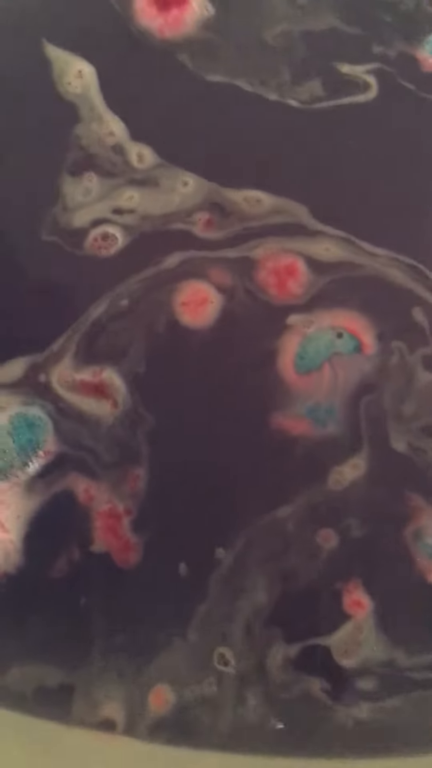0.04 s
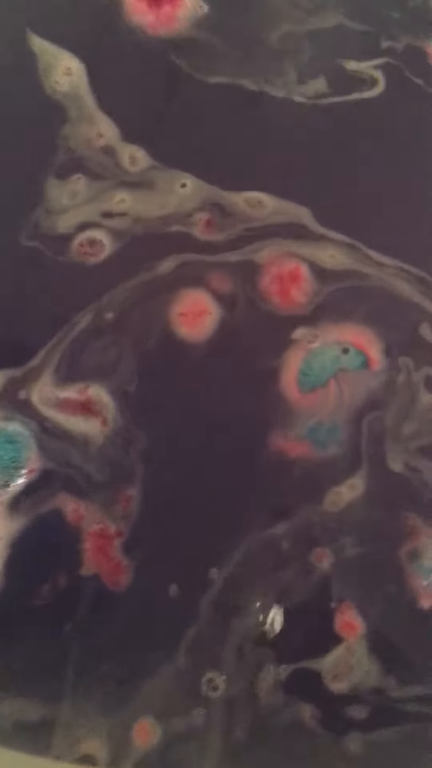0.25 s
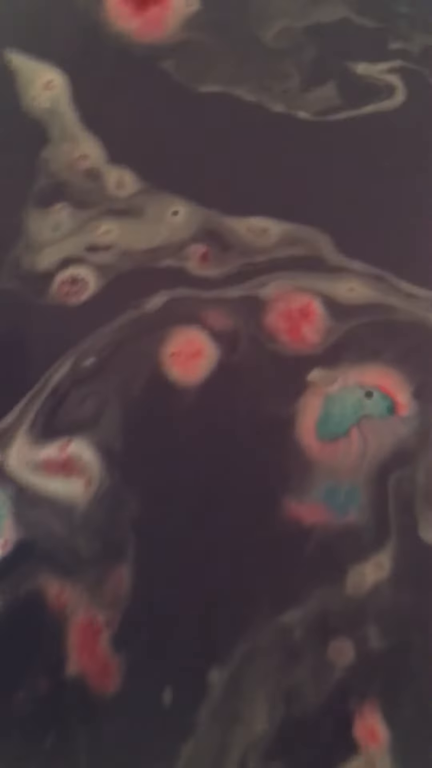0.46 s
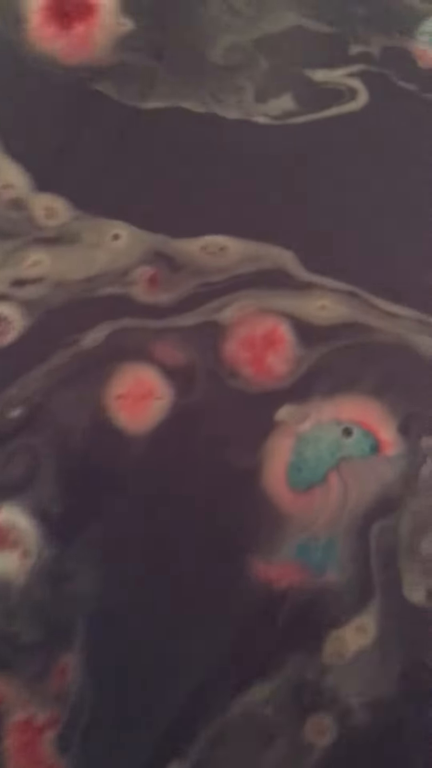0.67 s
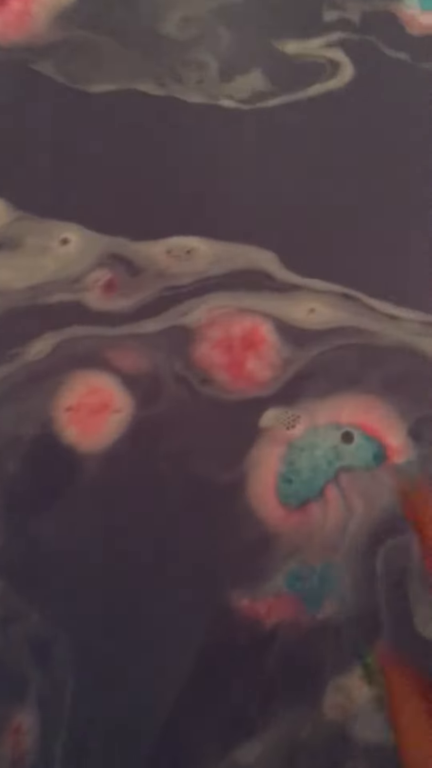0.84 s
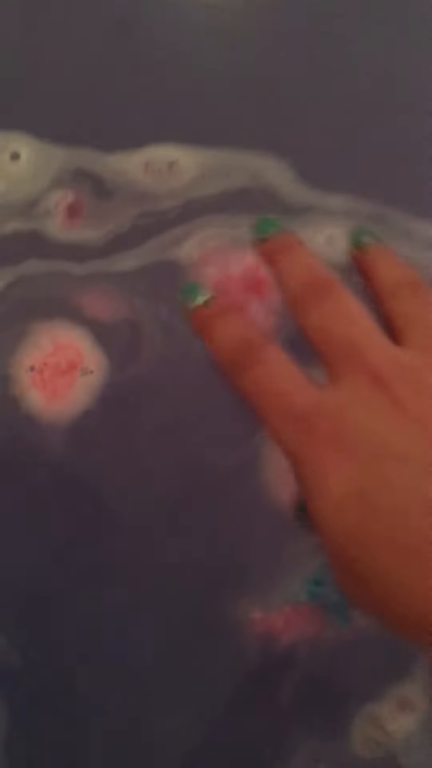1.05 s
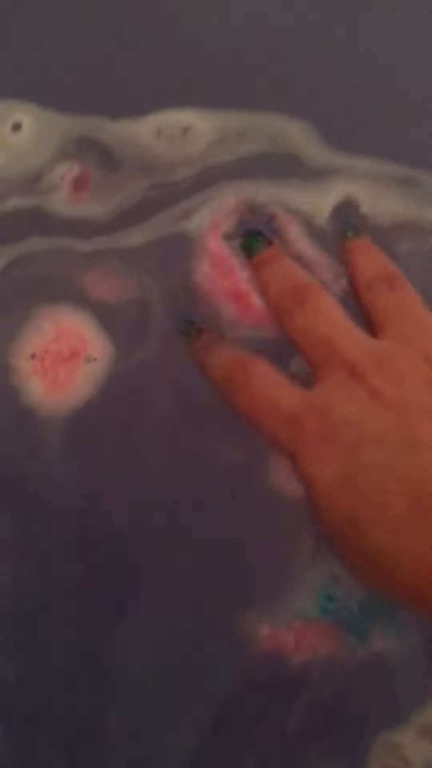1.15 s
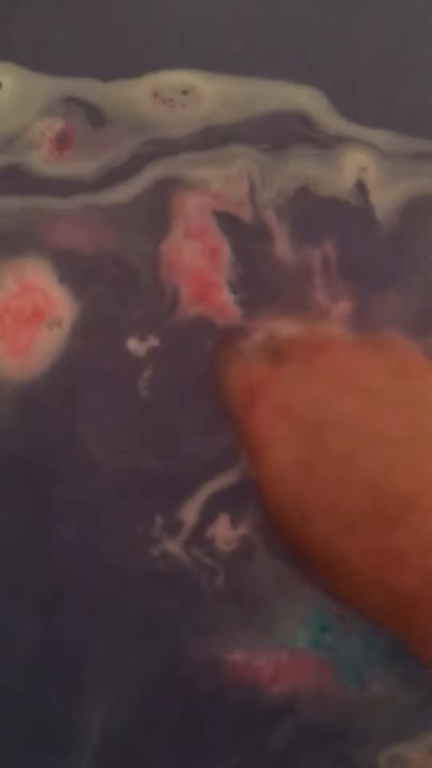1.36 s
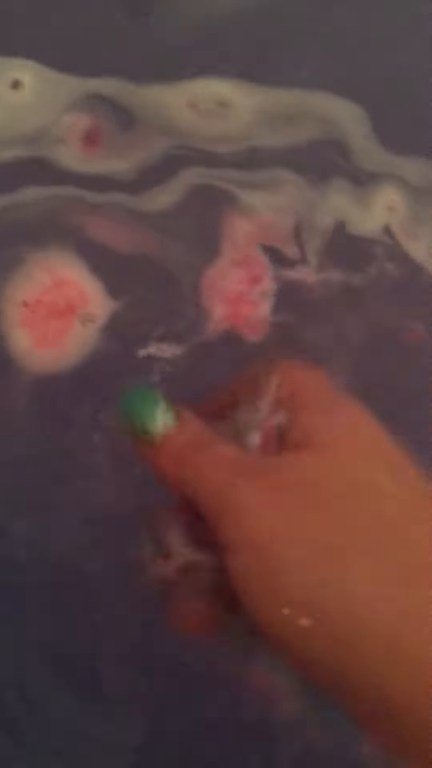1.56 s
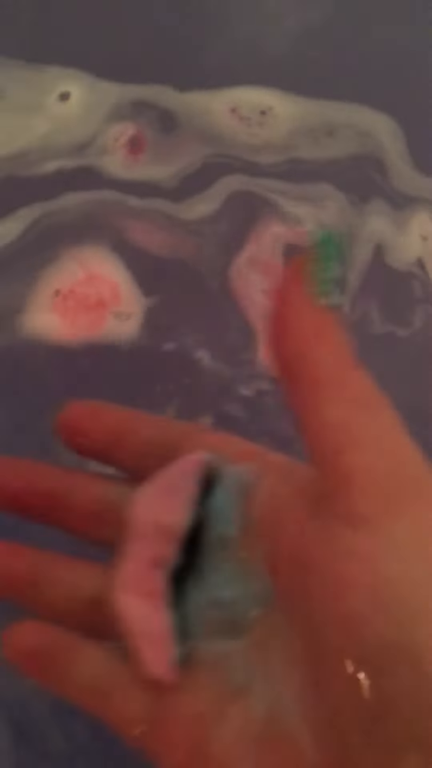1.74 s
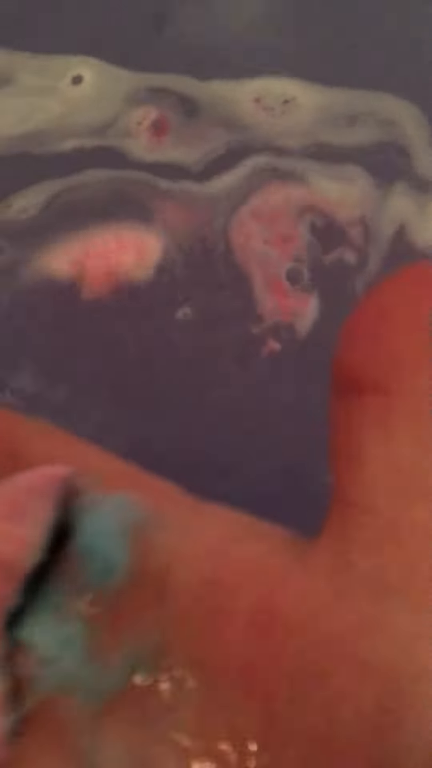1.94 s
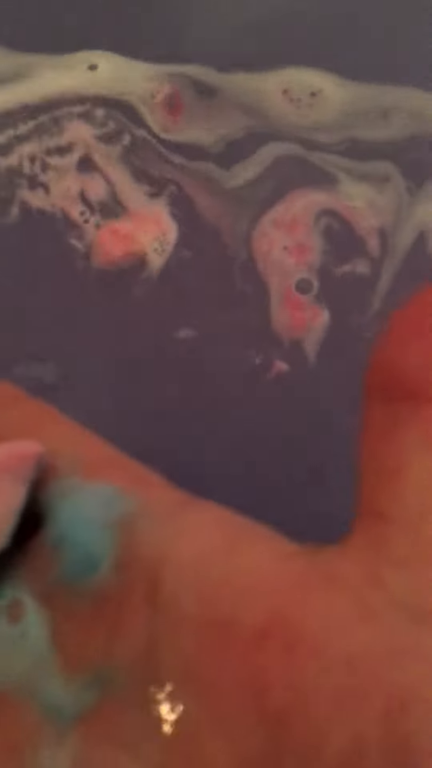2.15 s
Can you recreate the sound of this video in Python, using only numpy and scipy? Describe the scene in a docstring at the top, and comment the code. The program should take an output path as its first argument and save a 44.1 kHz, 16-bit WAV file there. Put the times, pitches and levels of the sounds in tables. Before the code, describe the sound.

Light splashes and plinking drips come from a hand in bathwater, heard up close in a small echoing bathroom. A sharp knock on the tub comes first, then faint thumps, one splash and scattered drips over a faint fizz.

```python
"""A quiet, tiled bathroom, with foam fizzing faintly on the bath water over a low rumble and soft hiss.
Something knocks hard against the tub, and tub and room ring. After a few faint, dull thumps a hand
slaps into the water, bumps the tub below the surface and lifts out again, shedding drips.
Hand and drips smack the surface and trap air that plinks as bubbles, echoing off tub walls and tiles."""
import sys
import numpy as np
from scipy import signal
from scipy.io import wavfile
from scipy.ndimage import uniform_filter1d, minimum_filter1d

SR = 44100
rng = np.random.default_rng(int(sys.argv[2]) if len(sys.argv) > 2 else 0)


def wav_out(sig):
    """Save sig, one row per channel (or a flat mono array), as 16-bit PCM at SR to the path in sys.argv[1]."""
    wavfile.write(sys.argv[1], SR, np.round(np.clip(np.atleast_2d(sig).T, -1, 1) * 32767).astype(np.int16))


N = 97020
T = np.arange(N) / SR
TOP_HZ = 15950


def amp(db):
    """Decibels to gain."""
    return 10 ** (np.asarray(db) / 20)


def unit(x):
    """Scales to rms 1."""
    return x / np.sqrt(np.mean(x ** 2) + 1e-20)


def curve_at(points, hz):
    """Reads a curve on a log-frequency axis."""
    f, value = np.transpose(points)
    return np.interp(np.log(hz + 1), np.log(f), value)


def fader(points):
    """Gain over time from rows of seconds and dB."""
    return amp(np.interp(T, *np.transpose(points)))


def add(mix, start_s, sound):
    """Mixes a sound in at a time."""
    part = mix[round(start_s * SR):][:len(sound)]
    part += sound[:len(part)]


def eq(x, points, size=8192):
    """Minimum-phase EQ from rows of Hz and dB."""
    log_gain = np.log(amp(curve_at(points, abs(np.fft.fftfreq(size, 1 / SR)))))
    taps = np.fft.ifft(np.exp(np.conj(signal.hilbert(log_gain)))).real
    return signal.fftconvolve(x, taps[:size // 2])[:N]


def noise(points):
    """Steady noise through an EQ, at rms 1."""
    return unit(eq(rng.standard_normal(N), points))


def envelope(t, t60, rise_s):
    """A soft attack on a decay that falls 60 dB in t60 seconds."""
    return (1 - np.exp(-t / rise_s)) * np.exp(-np.log(1000) * t / t60)


def ring(hz, t60, rise_s, glide=0):
    """A dying sine, its pitch rising by the share glide over t60 seconds."""
    t = np.arange(0, 2 * t60, 1 / SR)
    phase = 2 * np.pi * hz * t * (1 + glide * t / t60 / 2)
    return np.sin(phase) * envelope(t, t60, rise_s)


def grains(per_s, spread_db):
    """Random clicks, most small and a few large."""
    hits = rng.random(N) < per_s / SR
    return hits * amp(spread_db * np.minimum(rng.exponential(1, N), 4))


# Tone of the foam. Each row: frequency in Hz, gain in dB.
FOAM_EQ = [(500, -24.5), (3000, -21), (5000, -7.5), (6500, 0.5), (7400, -3.5), (9000, 1.5), (10400, -3.5),
           (12000, -2), (16000, -5)]
# The foam's slow swell. Each row: time in seconds, level in dB.
FOAM_FADER = [(0, -65), (.5, -64), (.9, -62), (1.25, -59.5), (1.6, -58.5), (2.2, -58.5)]


def foam(pops_db=-11.5):
    """A fine, bright fizz flecked with the pops of bursting foam."""
    pops = unit(grains(per_s=500, spread_db=5.5) * rng.standard_normal(N))
    fizz = rng.standard_normal(N) + amp(pops_db) * pops
    return unit(eq(fizz, FOAM_EQ)) * fader(FOAM_FADER)


# Tone of the hiss and of the rumble. Each row: frequency in Hz, gain in dB.
HISS_EQ = [(400, -11), (1400, -1), (2500, -4.5), (4200, 0), (6500, -9.5), (16000, -35)]
RUMBLE_EQ = [(20, -15.5), (40, -5.5), (60, 6), (85, -3.5), (115, 1), (150, -7.5), (220, -3), (300, -7.5),
             (600, -14), (1500, -30.5), (4000, -30.5), (16000, -45)]
# Rise and fall of the hiss. Each row: time in seconds, level in dB.
HISS_FADER = [(0, -77), (.2, -73.5), (.5, -65), (.65, -75.5), (.8, -72), (.95, -72.5), (1.1, -67),
              (1.5, -68.5), (2.2, -63)]


def room_tone(rumble_db=-66.5):
    """A soft mid-range hiss drifts in level over the room's steady low rumble."""
    return noise(HISS_EQ) * fader(HISS_FADER) + amp(rumble_db) * noise(RUMBLE_EQ)


# Contacts of the knock. Each row: start in seconds, relative level in dB, treble roll-off in Hz,
# pitch of a short ring in Hz, its level in dB.
KNOCK_HITS = [(.2281, 8, 5000, 2750, -20), (0.2305, 0.5, 1500, 605, -9.5), (0.2306, -1, 3600, 2585, -17.5),
              (.2398, 3, 2000, 1680, -7.5)]
# Tone of the crack. Each row: frequency in Hz, gain in dB.
KNOCK_EQ = [(40, -26), (62, -13), (90, -16), (160, -19.5), (300, -1), (420, -9.5), (560, -2.5), (750, -9),
            (1100, -1), (1750, -1), (2200, -8.5), (2650, -7.5), (3300, -10.5), (4500, -13.5), (6200, -22.5),
            (8000, -37.5), (15000, -48.5)]
# The tub's ringing notes. Each row: pitch in Hz, relative level in dB, seconds to fall 60 dB.
TUB_NOTES = [(262, 8, 0.047), (314.6, 11.5, .11), (304.6, 2.5, 0.53), (475.7, 5, .08), (481.6, -4.5, 0.24),
             (571.6, -2, 0.58), (923, -7.5, .26), (1068, 4, 0.2), (1160, 0, .33), (1263, -3.5, 0.3),
             (1342, -2, 0.25), (1471, -6, 0.25), (1620, -4, .3), (1678, 0, .22), (1953, -4, 0.3),
             (2463, 4, 0.17)]


def knock(hit_db=4, tub_db=-31.5, reverb_db=8.5):
    """A quick clatter of hard contacts rings the tub and fills the room."""
    blows, body = np.zeros(N), np.zeros(N)
    for start, db, dull_hz, ring_hz, ring_db in KNOCK_HITS:
        push = np.exp(-2 * np.pi * dull_hz * T[:SR // 20])
        add(blows, start, amp(db + hit_db) * push / push.sum())
        add(body, start, amp(ring_db) * ring(ring_hz, t60=0.023, rise_s=1 / ring_hz))
    for hz, db, t60 in TUB_NOTES:
        add(body, KNOCK_HITS[0][0], amp(db + tub_db) * ring(hz, t60, rise_s=0.016 * t60))
    crack = eq(blows, KNOCK_EQ)
    return crack + body + amp(reverb_db) * tile_reverb(crack)


# The bathroom's decay. Each row: frequency in Hz, seconds to fall 60 dB.
REVERB_TIMES = [(70, 0.63), (170, 0.53), (320, 0.68), (600, 0.59), (1200, 0.43), (2700, 0.46), (5000, .32),
                (15000, 0.13)]


def tile_reverb(x, onset_s=0.0014, early_db=1.5, early_s=0.02):
    """Dense reflections off the tiles: strong at first, the low mids lasting longest."""
    hz, frame_s, spectrum = signal.stft(rng.choice([-1., 1.], SR), SR, nperseg=256)
    decay = np.exp(-np.log(1000) * frame_s / curve_at(REVERB_TIMES, hz)[:, None])
    tail = signal.istft(spectrum * decay, SR)[1][:SR]
    t = T[:SR]
    tail *= (1 - np.exp(-t / onset_s)) * (1 + amp(early_db) * np.exp(-t / early_s))
    return signal.fftconvolve(x, tail / np.linalg.norm(tail))[:N]


# Soft low thumps. Each row: start in seconds, relative level in dB.
THUMP_HITS = [(.728, -54.5), (.80, -59.5), (.87, -63), (.93, -62), (2.02, -60.5), (2.045, -59)]
# Their bass-heavy tone. Each row: frequency in Hz, gain in dB.
THUMP_EQ = [(20, -3), (60, -3.5), (110, 4.5), (180, -11), (350, -24), (1500, -41)]


def thumps(decay_s=0.027, gain_db=22.5):
    """Faint, dull thumps: short puffs of noise with the top rolled off."""
    puffs, t = np.zeros(N), T[:SR // 4]
    for start, db in THUMP_HITS:
        add(puffs, start, amp(db) * rng.standard_normal(len(t)) * np.exp(-t / decay_s))
    return amp(gain_db) * eq(puffs, THUMP_EQ)


def plink(hz, cycles):
    """One bubble rings briefly, rising in pitch as it nears the surface."""
    return ring(hz, t60=cycles / hz, rise_s=0.72 / hz, glide=0.051)


# Water running off the hand. Each row: time in seconds, level in dB.
TRICKLE_FADER = [(.95, -76), (1.15, -68.5), (1.3, -58.5), (1.42, -71), (1.72, -71.5), (1.79, -53),
                 (1.835, -48), (1.865, -66), (1.9, -48), (1.96, -56.5), (2.03, -65), (2.08, -55.5),
                 (2.2, -100)]


def trickle(bubbles_per_s=1400, low_hz=1043, high_hz=10800, pitches=30):
    """Many tiny bubbles while the hand stirs the water and drains."""
    out = np.zeros(N)
    for hz in np.geomspace(low_hz, high_hz, pitches):
        triggers = grains(bubbles_per_s / pitches, spread_db=2.5)
        out += signal.oaconvolve(triggers, plink(hz, cycles=18))[:N]
    return unit(out) * fader(TRICKLE_FADER)


# Skin or drips hitting the water. Each row: start in seconds, relative level in dB, band centre in Hz.
SMACK_HITS = [(1.1835, -21, 2560), (1.2313, -12.5, 2500), (1.232, -16.5, 6060), (1.236, -18, 7150),
              (1.4448, -26.5, 4520), (1.682, -24, 2960), (1.7419, -17, 3670), (1.754, -20.5, 8500),
              (1.762, -20.5, 4460), (1.7803, -15.5, 2980), (1.802, -19, 5900), (1.829, -20, 4470),
              (1.844, -33, 6500), (1.853, -16.5, 2020), (1.868, -17, 3000), (1.9023, -21, 4140),
              (1.926, -45, 3660), (1.959, -19, 3070), (1.9948, -18, 1820), (2.056, -22.5, 4000),
              (2.062, -18, 3500), (2.069, -31, 8900), (2.1081, -24, 4500), (2.174, -21.5, 5500)]
# Tone shared by all smacks. Each row: frequency in Hz, gain in dB.
SMACK_EQ = [(100, -21.5), (500, -6.5), (1200, 1.5), (3000, -4), (6000, -6), (10000, -7), (16000, -4.5)]


def smacks(decay_s=0.0054, edge_ratio=1.9):
    """Very short sprays where the surface is struck, each with its own brightness."""
    out, t = np.zeros(N), T[:SR // 20]
    for start, db, hz in SMACK_HITS:
        band = signal.butter(1, [hz / edge_ratio, min(hz * edge_ratio, TOP_HZ)], "bandpass", fs=SR)
        spray = signal.lfilter(*band, rng.standard_normal(len(t)) * np.exp(-t / decay_s))
        add(out, start, amp(db) * spray / np.linalg.norm(spray))
    return eq(out, SMACK_EQ)


# Single bubbles. Each row: start in seconds, pitch in Hz, relative level in dB, cycles to fall 60 dB.
BUBBLE_NOTES = [(1.219, 1450, -36, 14), (1.2312, 1013, -18.5, 18), (1.2342, 1460, -29.5, 27),
                (1.233, 590, -36.5, 18.5), (1.2305, 295, -43, 9.9), (1.253, 340, -33, 8.7),
                (1.254, 522, -32.5, 6.2), (1.308, 2490, -45.5, 110), (1.313, 1070, -46, 23),
                (1.582, 1670, -49, 28), (1.615, 2760, -56, 130), (1.6832, 2700, -33.5, 32),
                (1.687, 1710, -46.5, 70), (1.7401, 3330, -27.5, 89), (1.747, 3710, -27.5, 41),
                (1.745, 1320, -31.5, 57), (1.7535, 8300, -22, 15), (1.754, 980, -19, 9.8),
                (1.78, 1000, -26, 17.6), (1.7804, 1740, -19.5, 35), (1.785, 2110, -25.5, 35),
                (1.789, 1370, -18, 15), (1.802, 5200, -32, 43), (1.817, 1790, -42, 19),
                (1.83, 5170, -36, 56), (1.8298, 1330, -32, 58), (1.846, 1556, -32.5, 67),
                (1.854, 1028, -29, 28), (1.859, 1980, -20.5, 16), (1.860, 2330, -39, 65),
                (1.863, 1540, -27, 37), (1.8677, 2608, -24, 77), (1.867, 1148, -26, 22),
                (1.87, 1846, -25, 35), (1.905, 4450, -25.5, 17.7), (1.905, 5160, -41, 40),
                (1.925, 3610, -33, 88), (1.938, 3320, -31.5, 70), (1.9578, 3140, -27.5, 45),
                (1.957, 1010, -40, 54), (1.968, 4070, -43, 51), (1.9936, 1006, -20, 26.3),
                (2.056, 2020, -34.5, 47), (2.0612, 1547, -28, 43), (2.074, 1540, -32.5, 52),
                (2.078, 2580, -35.5, 50), (2.108, 3700, -38.5, 37), (2.150, 3440, -49, 98),
                (2.174, 4740, -32, 32), (2.1762, 6730, -32.5, 23), (2.188, 2494, -43.5, 78)]


def bubbles():
    """Air trapped by the hand and by falling drips plinks, radiating little below its pitch."""
    out = np.zeros(N)
    for start, hz, db, cycles in BUBBLE_NOTES:
        low_cut = signal.butter(3, 0.8 * hz, "highpass", fs=SR)
        add(out, start, amp(db) * signal.lfilter(*low_cut, plink(hz, cycles)))
    return out


# First reflections in the tub. Each row: delay in seconds, linear gain.
WALL_TAPS = [(.0062, 0.22), (0.012, .17), (.027, .15)]


def wall_echoes(water):
    """The tub walls throw back quick, quieter copies of the water."""
    out = np.zeros(N)
    for delay, gain in WALL_TAPS:
        add(out, delay, gain * water)
    return out


# The hand bumping the tub. Each row: start in seconds, relative level in dB.
BUMP_HITS = [(1.556, -51.5), (1.577, -52), (1.614, -56.5), (1.679, -47)]
# Tone of its rub. Each row: frequency in Hz, gain in dB.
RUB_EQ = [(40, -37), (120, -14), (190, 4), (300, -8.5), (700, -17.5), (1500, -32.5), (5000, -37)]


def bumps(note_hz=189.3, rub_db=-5.5):
    """Soft contacts under water keep one low note of the tub sounding, with a dull rub."""
    swell = np.zeros(N)
    for start, db in BUMP_HITS:
        add(swell, start, amp(db) * envelope(T, t60=0.28, rise_s=0.0045))
    return swell * (np.sin(2 * np.pi * note_hz * T) + amp(rub_db) * noise(RUB_EQ))


def scene(reverb_db=-7.5):
    """Mono mix: the water and its echoes, the knock, bumps and thumps, over foam and room tone."""
    water = bubbles() + smacks() + trickle()
    echoes = wall_echoes(water) + amp(reverb_db) * tile_reverb(water)
    return (water + echoes + knock() + bumps() + thumps() + foam() + room_tone())[None]


def record(dry, ceiling=0.33, window_s=0.003):
    """A fast limiter holds down the loudest peaks; a steep low-pass trims the very top."""
    span = round(window_s * SR)
    needed_gain = ceiling / np.maximum(abs(dry), ceiling)
    smooth_gain = uniform_filter1d(minimum_filter1d(needed_gain, span), span)
    low_pass = signal.firwin(511, TOP_HZ, window=("kaiser", 9), fs=SR)
    return signal.oaconvolve(dry * smooth_gain, low_pass[None], "same")


dry = scene()
out = record(dry)
wav_out(out)
```